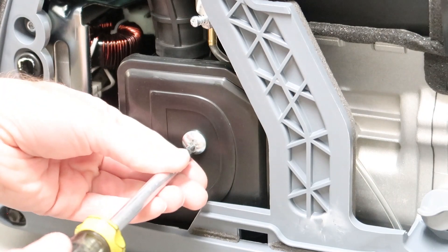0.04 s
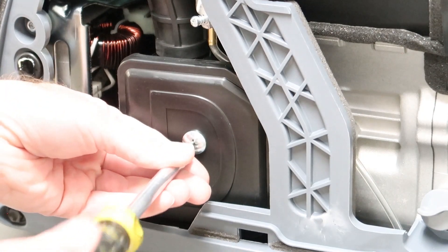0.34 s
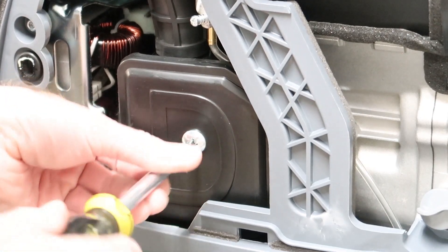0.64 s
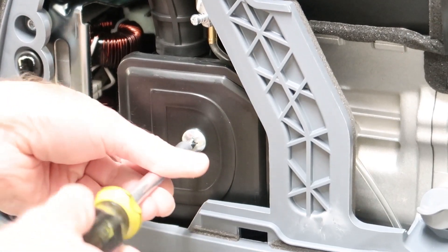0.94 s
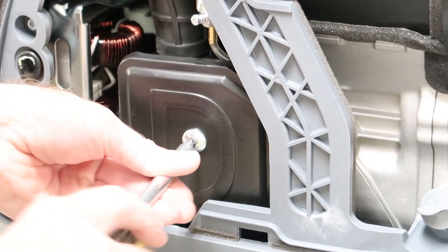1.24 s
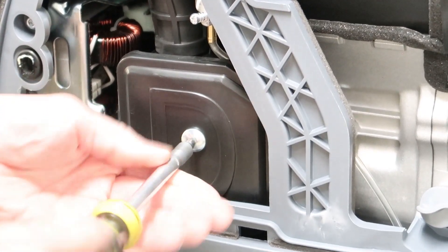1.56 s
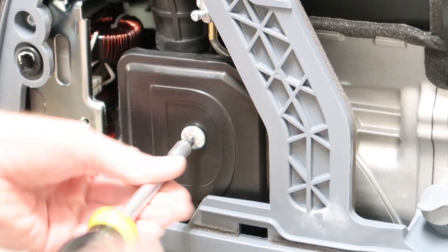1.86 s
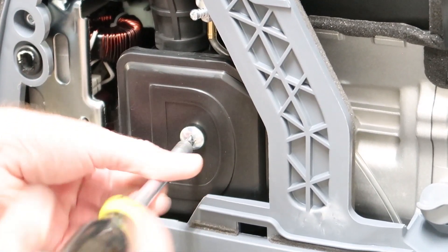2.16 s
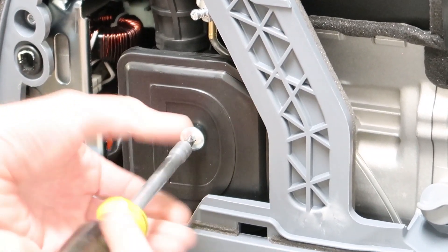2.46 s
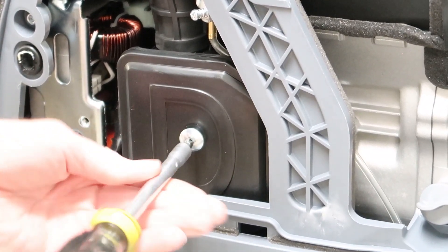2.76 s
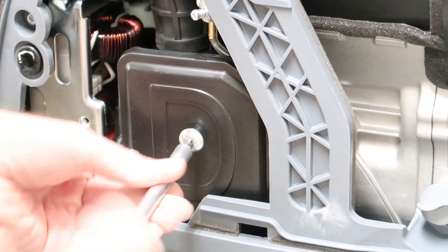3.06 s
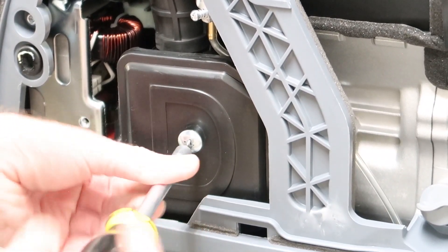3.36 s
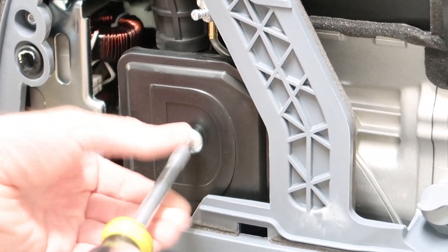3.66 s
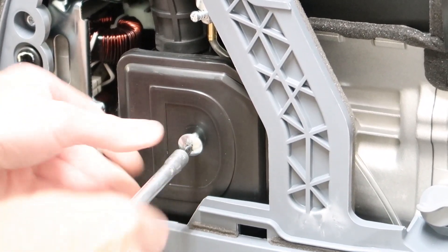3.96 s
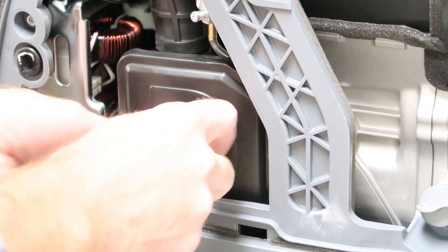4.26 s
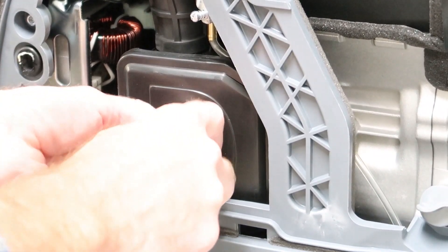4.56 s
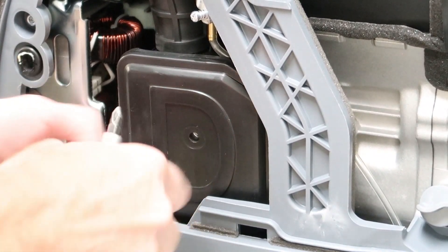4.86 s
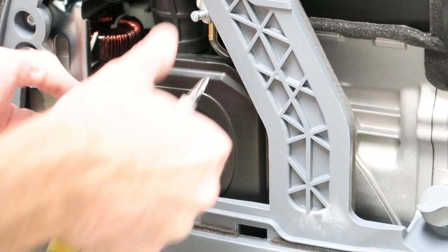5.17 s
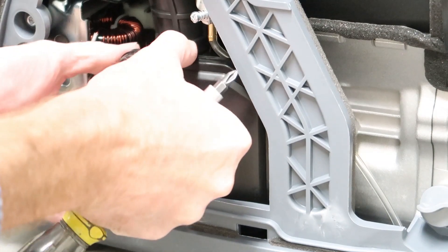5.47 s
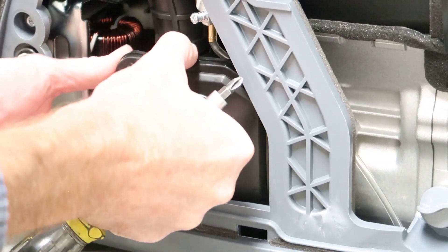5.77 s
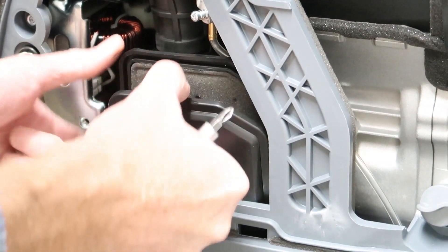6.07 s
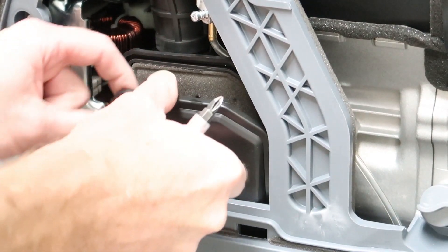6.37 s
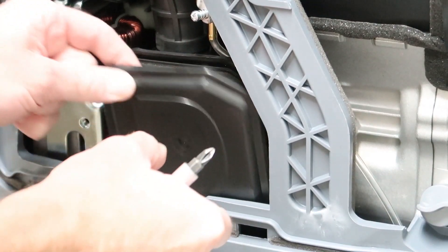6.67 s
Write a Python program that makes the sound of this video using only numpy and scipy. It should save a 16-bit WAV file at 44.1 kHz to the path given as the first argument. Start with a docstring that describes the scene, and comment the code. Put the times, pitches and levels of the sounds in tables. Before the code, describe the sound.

A screwdriver tip knocks and clicks into a screw on a plastic cover. The screw is then turned out in short repeated twists, the thread rasping and catching with small metallic ticks. The loose screw rattles and drags out of its hole. After a brief lull, the hollow cover rubs and comes off with a loud clack and a few lighter bumps. It is heard close up in a small workshop with a faint hum.

```python
"""Unscrewing an air-filter cover

A hand screwdriver backs a screw out of the plastic cover of a stopped engine, heard from close by.
The tip knocks into the screw head, and each impact excites the cover's damped modes. With every twist,
stick-slip friction makes the thread rasp and catch. The screw is drawn out and the hollow cover is
pulled off with a loud clack. A small workshop hums quietly around it."""
import sys
import numpy as np
from scipy import signal
from scipy.fft import rfft, irfft, next_fast_len
from scipy.io import wavfile
from scipy.ndimage import uniform_filter1d

SR = 44100
rng = np.random.default_rng(int(sys.argv[2]) if len(sys.argv) > 2 else 0)


def store_pcm(level_fs):
    """Save levels as 16-bit WAV."""
    pcm = np.round(np.clip(level_fs, -1, 1) * 32767).astype(np.int16)
    wavfile.write(sys.argv[1], SR, np.atleast_2d(pcm).T)


N = 296190
TIME = np.arange(N) / SR
AGE = np.arange(16384) / SR  # seconds since an excitation
TOP_HZ, SCATTER_FROM_HZ, COVER_BAND_HZ = 15750, 620, (200, 640)


def undb(db):
    """Decibels to gain."""
    return 10 ** (np.asarray(db) / 20)

def level(x, db):
    """Set the rms level."""
    return x * undb(db) / np.sqrt(np.mean(x ** 2))

def add(out, start, x):
    """Superposition: x joins the mix at a start time in seconds."""
    i = int(start * SR)
    out[i:i + len(x)] += x[:N - i]

def colour(x, points):
    """Minimum-phase filtering: a causal response through (Hz, dB) points."""
    size = 2 * next_fast_len(len(x))
    hz, db = np.transpose(points)
    bin_hz = np.arange(size // 2 + 1) * SR / size
    gain = undb(np.interp(np.log(bin_hz + 1), np.log(hz), db))
    cepstrum = irfft(np.log(gain))
    cepstrum[1:size // 2] *= 2
    cepstrum[size // 2 + 1:] = 0
    return irfft(rfft(x, size) * np.exp(rfft(cepstrum)))[:len(x)]

def band(x, lo_hz, hi_hz):
    """Band-pass filtering: 12 dB per octave on either side."""
    sos = signal.butter(2, [lo_hz, min(hi_hz, SR / 2 - 1)], "band", fs=SR, output="sos")
    return signal.sosfilt(sos, x)

def attack_rms(x):
    """Effective amplitude of a transient: the rms of its first 8 ms."""
    return np.sqrt(np.mean(x[:353] ** 2))

def walk(rate):
    """Random modulation: a smooth curve of unit rms, with `rate` new values a second."""
    hold = int(SR / rate)
    steps = np.repeat(rng.standard_normal(N // hold + 1), hold)
    return level(uniform_filter1d(uniform_filter1d(steps, hold), hold)[:N], 0)

def fade(t60):
    """Exponential damping: 60 dB down after t60 seconds."""
    return np.exp(-np.log(1000) * AGE / t60)

def stroke(start, length, attack_s, release_s):
    """Envelope of a driven vibration: linear rise, hold and exponential decay."""
    age = TIME - start
    return np.clip(age / attack_s, 0, 1) * np.exp(-np.maximum(age - length, 0) / release_s)

def wash(t60):
    """High modal overlap: decaying noise of unit energy with an even spectrum."""
    spectrum = rfft(rng.standard_normal(len(AGE)) * fade(1.33 * t60))
    x = irfft(spectrum / np.abs(spectrum)) * fade(2 * t60)
    return x / np.linalg.norm(x)

def ring(modes, scatter_db, detune=0.012):
    """Free vibration of unit energy: modal shares and tuning vary with where a part is struck and held."""
    x = 0
    for hz, db, t60 in modes:
        share, shift = rng.standard_normal(2)
        phase = 2 * np.pi * hz * (1 + detune * shift) * AGE + rng.uniform(-1.25, 1)
        x = x + undb(db + scatter_db * share) * fade(t60) * np.cos(phase)
    return x / np.linalg.norm(x)

def slips(count, rate, spread_db):
    """Stick-slip friction: random impulses of uneven size, `rate` a second, at unit rms."""
    sizes = undb(spread_db * np.minimum(rng.exponential(size=count), 4))
    return level(sizes * rng.choice([-1, 1], count) * (rng.random(count) < rate / SR), 0)

def scuff(jumps):
    """Finite slip time: convolution spreads each impulse into a tiny scrape."""
    return signal.oaconvolve(jumps, wash(0.007)[:512])[:len(jumps)]

def blows(rows, modes, panel_db, panel_t60, treble_db, modes_db=-10.5):
    """Impact on a shell: contact, dense panel rattle and modes, coloured by the contact's hardness."""
    out = np.zeros(N)
    bands_hz = [(180, 550), (550, 1400), (1400, 4300), (4300, 8000), (8000, 15000)]
    for start, db, thump, crack, top in rows:
        contact = wash(0.006) * undb(0.9 * max(crack, 0))  # a hard crack strengthens the first snap
        panel = undb(panel_db) * band(wash(panel_t60), SCATTER_FROM_HZ / 2, TOP_HZ)
        x = contact + panel + undb(modes_db) * ring(modes, scatter_db=2.5)
        # a small shell radiates little bass, and plastic falls off steeply above 4 kHz
        x = colour(x, [(60, -29), (165, -21), (235, 0), (3900, -9), (4700, -18), (15000, -27)])
        wanted_db = db + np.array([thump, 0, crack, (crack + top) / 2 + treble_db, top])
        for _ in range(2):  # two passes, since the bands overlap
            lift_db = wanted_db - [20 * np.log10(attack_rms(band(x[:512], *hz))) for hz in bands_hz]
            x = colour(x, [(np.sqrt(lo * hi), gain) for (lo, hi), gain in zip(bands_hz, lift_db)])
        add(out, start, x)
    return out

def taps(rows, modes):
    """Impulse response: one part rings at fixed pitches after each tap."""
    out = np.zeros(N)
    for start, db in rows:
        x = ring(modes, scatter_db=-1, detune=0)
        add(out, start, x * undb(db) / attack_rms(x))
    return out


# Spectrum of the room's air. Each row: frequency in Hz, relative spectral density in dB.
ROOM_AIR = [(12, -36), (20, -2.5), (126, -7), (153, -7), (274, -10), (1040, -22), (1500, -22),
            (6540, -34.5), (13500, -45), (15500, -55)]

def background(air_db=-51.5, hum_hz=120, hum_db=-55, drone_hz=36.2, drone_db=-47, drone_stop_s=1.68):
    """Ambient noise: broadband air, a wavering mains hum and a deep drone that stops early on."""
    mid, across = (level(colour(rng.standard_normal(N), ROOM_AIR), air_db) for _ in range(2))
    # the hiss is unrelated left and right, the rumble is shared
    side = colour(across, [(110, -21.5), (200, -7.5), (400, -1), (1200, 0)])
    running = np.exp(-np.maximum(TIME - drone_stop_s, 0) / 0.23)
    hum = level(np.sin(2 * np.pi * hum_hz * TIME + 0.5 * walk(9)) * undb(2 * walk(5)), hum_db)
    drone = np.sqrt(2) * np.sin(2 * np.pi * drone_hz * TIME + 0.11 * walk(7)) * undb(drone_db)
    air = np.array([mid + side, mid - side]) * undb(3 * running)  # louder while the drone lasts
    return air + hum + drone * running


# Knocks on the seated cover. Each row: start in seconds, level at 550-1400 Hz in dB, then the
# low thump, the crack and the top in dB relative to that level.
KNOCKS = [(0.0592, -39, 4.5, 2.5, -24), (0.1432, -41.5, 3, 2, -30), (0.231, -54, 16.5, 5.5, -41),
          (0.237, -36.5, -15, 0.5, -34), (0.2699, -39.5, -44, -2.5, -14), (0.29, -39, -19.5, -9, -24),
          (0.5463, -30.5, 2, -11.5, -18), (0.6839, -19, 0, -11, -19), (0.6965, -28.5, 8.5, 5.5, -41),
          (0.7055, -18, 1.5, 3.5, -18.5), (0.9288, -31.5, -3.5, -1.5, -37), (0.944, -36.5, 8.5, 2, -24.5),
          (1.0872, -33, -16, -3.5, -24), (1.1, -36.5, -3.5, -8, -26), (1.1404, -23, -4, 1.5, -8),
          (1.226, -47, 4, 8, -14), (3.756, -31.5, -1, -1, -27), (3.912, -42, -0.5, -6, -45),
          (4.1818, -40.5, 7, -0.5, -24.5), (4.2277, -42, 4.5, -6, -26), (4.319, -28.5, 5, -0.5, -10),
          (4.331, -29.5, -10, -1, -16), (4.3935, -32, 3.5, 1.5, -25.5), (4.5672, -41.5, 4, 2, -14.5),
          (4.586, -34, -1.5, -1, -25), (4.62, -45.5, -3, 10, 7.5), (4.6268, -30.5, 0.5, -13, -50),
          (4.719, -37.5, 5.5, 0.5, -34), (4.742, -36, -8, 0.5, -23), (4.7605, -38, -2, 5.5, -29),
          (4.7775, -36, -4.5, 0, -32)]
# Modes of the seated cover. Each row: frequency in Hz, relative level in dB, T60 in seconds.
SEATED_MODES = [(253.6, 1.5, 0.066), (325.8, 3.5, 0.077), (479, -0.5, 0.14), (674, -1, .05),
                (734, 2.5, 0.12), (994, -1, 0.11), (1322, 1.5, .05), (1760, 16, 0.014), (2254, 3, 0.09),
                (3790, -3.5, .022)]

def tool_knocks():
    """Impact excitation: tool and screw knock on the cover while it is held in its seat."""
    return blows(KNOCKS, SEATED_MODES, panel_db=4.5, panel_t60=0.11, treble_db=0.5)


# Square taps of the tip. Each row: start in seconds, level in dB.
FACE_TAPS = [(0.29, -41), (0.5469, -22.5), (1.099, -30.5)]
# Modes of the cover's face. Each row: frequency in Hz, relative level in dB, T60 in seconds.
FACE_MODES = [(277, 1.5, .07), (955, 2.5, 0.063), (1020, -1, 0.053), (1140, -6, 0.049), (1274, -8, 0.091),
              (1800, -8, 0.027), (1970, -6, .03), (2285, -6, 0.036)]

def face_taps():
    """Plate vibration: a square tap of the tip leaves the cover's face ringing."""
    return taps(FACE_TAPS, FACE_MODES)


# Strong catches of steel on steel; the first two rows are the shaft ringing after the two hardest knocks. Each
# row: time in seconds, tick level in dB, cover and # shaft levels in dB relative to the tick, time constant of
# the following rasp in seconds.
CATCHES = [(0.7055, -37.5, -20, 7, .003), (1.14, -36, -17, 1, 0.0047), (1.378, -49, -10, -28, .01),
           (1.411, -51, -6, -9, 0.016), (1.515, -50, 6.5, -16, 0.017), (1.532, -41.5, 1, -9, 0.023),
           (1.578, -41, -12, -9, 0.013), (1.589, -31, -9, -10, 0.0081), (1.656, -45.5, 5, -28, 0.005),
           (1.68, -43.5, -10, 3, 0.018), (1.698, -40.5, -10, -12, 0.0092), (1.723, -38.5, -8, -27, 0.01),
           (1.738, -35.5, -8, -10, 0.01), (1.749, -33, -9, -14, .014), (1.7796, -40, -3, -10, .012),
           (1.796, -38.5, -1, -17, 0.028), (1.839, -36, -4.5, -29, 0.019), (1.979, -35, 0, -15, 0.017),
           (1.998, -31.5, -8, -3.5, .022), (2.077, -35, 4.5, -0.5, 0.021), (2.101, -35.5, -4, -11, 0.011),
           (2.18, -37, -20, -25, 0.0098), (2.1975, -38, -16.5, -13, .006), (2.2066, -33, -23, -1.5, 0.022),
           (2.352, -40.5, -18, -26, 0.0052), (2.376, -30, -3, -5.5, 0.0093), (2.422, -37.5, -2, 0, 0.015),
           (2.4596, -31, -3.5, 0.5, 0.014), (2.4864, -35, 1, 4, 0.0083), (2.505, -42, 8, -24, 0.0048),
           (2.56, -35, -10, -16, 0.025), (2.576, -39, 5, -4.5, 0.021), (2.617, -36, -8, -24, 0.0032),
           (2.673, -41.5, 5, -9, 0.0054), (2.7815, -35, -1.5, 4.5, 0.029),
           (2.8513, -34.5, -15, 7.5, 0.0066), (2.867, -32.5, -5, -1, 0.034), (2.941, -40, 3.5, 1.5, 0.0036),
           (2.993, -31, -2.5, 0.5, .012), (3.001, -28.5, -7.5, -12, 0.0043), (3.066, -39.5, -6, -12, 0.005),
           (3.1743, -32, 0, -5, 0.0031), (3.187, -33.5, -10, -6.5, 0.02), (3.25, -42.5, 0, -0.5, 0.075),
           (3.274, -43.5, -0.5, 2, 0.013), (3.327, -39, 4, -4.5, 0.022), (3.404, -31, -22, -3.5, 0.0056),
           (3.425, -34, -20, 3.5, 0.0058), (3.563, -55, 3, 5, 0.015), (3.592, -28.5, -6, -14, 0.0072),
           (3.604, -39, 8, -7, 0.019), (3.6578, -40, -2, -10, .006), (3.67, -40, -1, -3.5, 0.015),
           (3.724, -35.5, 0, -8, 0.022), (3.788, -29.5, -28, -15, 0.017), (3.8, -31.5, -4.5, -7, 0.0044),
           (3.9625, -40, -18, -20, 0.0057), (3.9705, -35.5, -5.5, -1, 0.011),
           (4.0193, -38, -12, -15, 0.0091), (4.311, -33.5, -6, -4.5, 0.0079), (4.444, -43, -1, -3.5, 0.01),
           (5.128, -39, -30, -11, 0.0069), (5.149, -43, -25, -14, 0.0044), (5.173, -45, -21, -5.5, 0.051),
           (5.207, -37.5, -31, 1, 0.011)]
# Response of screw and shaft to friction. Each row: frequency in Hz, gain in dB.
STEEL_SPECTRUM = [(150, -37), (300, -21), (800, 3.5), (1350, 8), (2400, 10.5), (3200, 5.5), (3700, 14.5),
                  (4400, 1), (5000, -4), (5650, 4), (6100, -1), (6600, -16), (7400, -7.5), (10000, -11),
                  (14000, -40)]
# Modes of the finger-damped shaft. Each row: frequency in Hz, relative level in dB, T60 in seconds.
SHAFT_MODES = [(5760, 3.5, 0.0045), (5930, -6, 0.0011), (6550, 5.5, 0.0072), (7180, 8, 0.0006)]
# Modes of the cover shaken through the screw, with the same columns.
SHAKEN_MODES = [(222, -7.5, .06), (262, -7, .06), (330, -1.5, .06), (396, -8, .04), (455, -1, .05),
                (500, 0, .06), (586, -5, .04)]

def catches(rasp_db=4.5, lead_db=-8, lead_s=0.03, rise_s=0.007, top_db=-19.5, size=6144):
    """Release of elastic strain: the thread grinds, lets go with a tick and runs on in gritty slips."""
    out, lead = np.zeros(N), int(lead_s * SR)
    age, grit = AGE[:size] - lead_s, undb(3 * walk(260))
    for start, db, cover_db, shaft_db, decay_s in CATCHES:
        build_up = undb(lead_db) * np.exp(-np.abs(age) / rise_s)
        swell = np.where(age < 0, build_up, np.exp(-np.abs(age) / max(decay_s, 0.002)))
        rasp = scuff(slips(size, rate=2400, spread_db=2)) * swell * grit[int(start * SR):][:size]
        force = np.roll(wash(0.0047)[:size], lead) + undb(rasp_db) * rasp / np.linalg.norm(rasp)
        # the tip seats differently each time, which shifts the steel's resonances
        seat = 1 + 0.045 * rng.standard_normal()
        tick = colour(force, [(hz * seat, gain) for hz, gain in STEEL_SPECTRUM])
        shaft_ring = ring([(hz * seat, gain, t60) for hz, gain, t60 in SHAFT_MODES], scatter_db=1.5)
        shaft = signal.fftconvolve(force, shaft_ring[:lead])[:size]
        cover = np.roll(ring(SHAKEN_MODES, scatter_db=4), lead)[:size]
        parts = [(band(tick, 500, 4500), 0),
                 (band(cover, *COVER_BAND_HZ), cover_db),
                 (band(shaft, 4800, 8400), shaft_db),
                 (band(force, 7600, 11500), top_db + shaft_db / 2)]  # brighter as the shaft rings harder
        for x, relative_db in parts:
            add(out, start - lead_s, x * undb(db + relative_db) / attack_rms(x[lead:]))
    return out


# Snaps of the cover's rim. Each row: start in seconds, level in dB.
RIM_SNAPS = [(0.7058, -21), (6.1008, -12.5)]
# Modes of the rim. Each row: frequency in Hz, relative level in dB, T60 in seconds.
RIM_MODES = [(2380, -4.5, 0.028), (3240, -11.5, 0.058), (3884, 0, .025), (4114, -2, 0.018),
             (7450, -8, 0.012)]

def rim_snaps():
    """Transient excitation: the rim rings as it snaps against its seat, and later free of it."""
    return taps(RIM_SNAPS, RIM_MODES)


# Low swells after heavy knocks. Each row: start in seconds, length in seconds, level in dB.
BOOMS = [(1.148, 0.23, -49), (6.108, 0.16, -48.5)]

def room_boom(hz=120.3, attack_s=0.04, release_s=0.062):
    """Standing wave: the room's lowest mode answers late and softly."""
    tone = np.sqrt(2) * np.sin(2 * np.pi * hz * TIME + 0.5 * walk(9))
    return tone * sum(undb(db) * stroke(start, length, attack_s, release_s) for start, length, db in BOOMS)


def bend(x, depth_s):
    """Frequency modulation by a wandering delay: changing hand pressure bends the resonances."""
    return np.interp(TIME + depth_s * walk(10), TIME, x)

# Twists of the wrist, about 2.4 a second. Each row: start in seconds, length in seconds, gain of the
# steel's rasp in dB, gain of the cover's grumble in dB.
TWISTS = [(1.487, 0.41, -53.5, -45), (1.96, 0.31, -46, -44.5), (2.363, 0.26, -47.5, -50),
          (2.754, 0.27, -45.5, -44), (3.172, 0.28, -48.5, -45), (3.562, .26, -49, -43.5),
          (3.95, 0.051, -44.5, -61.5), (4.277, 0.026, -52, -39)]
# Modes of the screw. Each row: frequency in Hz, relative level in dB, T60 in seconds.
SCREW_MODES = [(1400, -4, .012), (2290, -2, .02), (2672, -3, .025), (3750, 0, .013)]

def thread(attack_s=0.0079, release_s=0.076):
    """Friction-driven vibration: slips and small catches make the steel rasp and the cover grumble."""
    grip = undb(3 * walk(70) + 3 * walk(260))  # clusters and finer grit
    ticks = level(scuff(slips(N, rate=150, spread_db=4)), 0)
    force = level(scuff(slips(N, rate=2400, spread_db=1.5)) * grip, 0) + undb(-6) * ticks

    def rung(modes, db):
        """Resonant response to the small catches."""
        return level(signal.oaconvolve(ticks, ring(modes, scatter_db=1.5))[:N], db)

    crackle = level(band(slips(N, rate=170, spread_db=4), 7000, 14500), -23)
    rasp = level(colour(force, STEEL_SPECTRUM), 2) + rung(SHAFT_MODES, -15) + rung(SCREW_MODES, -12)
    shaken = signal.oaconvolve(force, ring(SHAKEN_MODES, scatter_db=4))[:N]
    grumble = level(band(shaken, *COVER_BAND_HZ), -4) + rung(SHAKEN_MODES[2:], -10)
    grumble *= undb(2.2 * walk(35))  # the tip bears on the cover by fits and starts
    rasp = bend(rasp, depth_s=0.0045) + crackle
    grumble = bend(grumble, depth_s=0.004)
    creep = (1.49, 3.06, -67.5, -49.5)  # one long, faint twist: the screw creeps between the others
    return sum(stroke(start, length, attack_s, release_s) * (rasp * undb(steel) + grumble * undb(cover))
               for start, length, steel, cover in TWISTS + [creep])


# Burrs snapping in the thread. Each row: start in seconds, level in dB.
BURRS = [(1.98, -60), (2.01, -50), (2.098, -52.5), (2.7817, -43), (2.7924, -59), (2.8053, -58),
         (2.8436, -44), (2.9282, -52), (2.993, -46), (3.426, -48), (3.5644, -54), (3.5805, -50),
         (3.8058, -49), (4.3108, -44), (5.209, -63)]

def burrs(centre_hz=10500, spread=0.12, t60=0.0054):
    """Brief band-limited transients: each burr snaps with a thin tick at its own high pitch."""
    out = np.zeros(N)
    for start, db in BURRS:
        hz = centre_hz * (1 + spread * rng.standard_normal())
        tick = band(wash(t60), hz * 0.8, hz * 1.2)
        add(out, start, tick * undb(db) / attack_rms(tick))
    return out


def squeak(start_s=4.126, hz=2350, db=-48, length_s=0.03):
    """Narrow-band resonance: slips briefly lock onto one mode of the screw."""
    tone = level(band(slips(len(AGE), rate=2000, spread_db=2), hz * 0.92, hz * 1.08), db)
    out = np.zeros(N)
    add(out, start_s, tone * np.exp(-(AGE / length_s) ** 2))
    return out


# Rattles of the loosened screw. Each row: start in seconds, level in dB.
RATTLES = [(4.322, -29.5), (4.586, -37), (4.627, -40)]
# Modes of the screw in its hole. Each row: frequency in Hz, relative level in dB, T60 in seconds.
HOLE_MODES = [(1300, -4, 0.08), (1453, 4, 0.069), (1760, -4, .06)]

def screw_rattles():
    """Impacts across a clearance: the loosened screw strikes its hole and rings."""
    return taps(RATTLES, HOLE_MODES)


# Rubs on the plastic. Each row: start in seconds, length in seconds, gain in dB.
RUBS = [(4.696, 0.085, -29.5), (5.765, 0.21, -55.5), (6.004, 0.089, -41), (6.064, 0.022, -25.5),
        (6.62, 0.095, -44.5)]

def slide(attack_s=0.024, release_s=0.013):
    """Sliding friction: the screw drags out of its hole, then the rim rubs on the housing."""
    plastic = [(150, -22.5), (300, -4.5), (500, 5.5), (750, -2), (1200, -11), (4000, -22), (12000, -51)]
    rub = level(colour(slips(N, rate=620, spread_db=-5), plastic), -2)
    return rub * sum(undb(db) * stroke(start, length, attack_s, release_s) for start, length, db in RUBS)


# Bumps of the loose cover. Each row: start in seconds, level at 550-1400 Hz in dB, then the
# low thump, the crack and the top in dB relative to that level.
BUMPS = [(5.366, -53.5, 4.5, -8, -17), (5.712, -63, 15, 0, -13), (6.0002, -39.5, -1.5, -24, -40),
         (6.025, -21, -2.5, -14.5, -34), (6.0905, -24.5, -5.5, -11, -24.5), (6.1005, -4, -13, -7, -31),
         (6.112, -17, 1, -16, -41), (6.4248, -22, -9, -14.5, -45), (6.6275, -31.5, -8.5, -18, -59.5),
         (6.6467, -31, -3, -27, -61)]
# Modes of the loose shell. Each row: frequency in Hz, relative level in dB, T60 in seconds.
LOOSE_MODES = [(226, -11, .07), (327.8, -1, 0.24), (365, -12.5, 0.16), (535, 6, 0.1), (645, 13, 0.073),
               (727, 8, 0.11), (890, 3.5, 0.04), (1014, -1.5, .06), (1235, 6, 0.09), (1862, 0.5, .04),
               (2410, -5.5, .06), (3180, -9.5, .06), (4180, 7, 0.018)]

def cover_bumps():
    """Shell resonance: the freed, hollow cover clacks against its housing."""
    return blows(BUMPS, LOOSE_MODES, panel_db=2.5, panel_t60=0.065, treble_db=-1.5)


def reverb(t60):
    """Diffuse reverberation: decaying noise of unit energy."""
    x = rng.standard_normal(len(AGE)) * fade(t60)
    return x / np.linalg.norm(x)

# Air modes in the engine's casing. Each row: frequency in Hz, relative peak in dB, T60 in seconds.
CAVITY_MODES = [(219.5, 5, 0.22), (265.1, 2, 0.25), (334.9, 2, 0.21), (397, -7, 0.25), (468, 0.5, 0.11),
                (592, -10.5, 0.41), (711, -4, 0.17)]
# Stereo width. Each row: frequency in Hz, gain of the side signal in dB.
WIDTH = [(100, -36.5), (600, -25), (1200, -19), (2800, -11.5), (5000, -3.5), (7000, 0.5), (9500, 4.5),
         (14000, 5.5)]

def workshop(x, near_db, far_db, cavity_db, bass_db, build_s=0.0032):
    """Scattering, reflection and cavity resonance: the surroundings colour a sound, and the stereo image is
    wide, most of all in the treble."""
    def tail():
        """Engine parts scatter short waves early; the walls return a longer decay."""
        near = undb(near_db) * band(wash(0.18), SCATTER_FROM_HZ, TOP_HZ)
        far = undb(far_db) * (band(reverb(0.33), 300, 2700) + band(reverb(0.22), 2700, 6900))
        return (near + far) * (1 - np.exp(-AGE / build_s))

    direct = AGE == 0
    casing = sum(undb(db + cavity_db) * 2 * fade(t60) / fade(t60).sum() * np.cos(2 * np.pi * hz * AGE)
                 for hz, db, t60 in CAVITY_MODES)
    mid = colour(direct + tail() + casing, [(450, bass_db), (750, 0.0014)])
    # the image is wide from the first instant, most of all in the treble
    side = colour(tail() + undb(-4) * wash(0.008), WIDTH)
    return np.array([signal.oaconvolve(x, mid + sign * side)[:N] for sign in (1, -1)])

def shifting(rate, count=4):
    """Time-varying paths: shares that sum to one pass the lead back and forth as the hands move."""
    weights = np.exp(2 * np.array([walk(rate) for _ in range(count)]))
    return weights / weights.sum(axis=0)

def scene():
    """Superposition of sources: tool, screw and cover sound in the workshop, in stereo."""
    seated = tool_knocks() + face_taps() + screw_rattles()
    loose = cover_bumps() + rim_snaps()
    friction = catches() + thread() + burrs() + slide() + squeak()
    # the turning hands keep changing the reflections around the screw
    turning = sum(workshop(friction * share, near_db=0.1, far_db=-8.5, cavity_db=3, bass_db=0)
                  for share in shifting(rate=10))
    return (workshop(seated, near_db=-9, far_db=-7.5, cavity_db=0.5, bass_db=-2.1)
            + workshop(loose, near_db=-7.5, far_db=-11, cavity_db=3, bass_db=-0.3)
            + turning + room_boom() + background())

def gain_control(x, threshold=0.54, duck_db=4, release_s=0.7):
    """Automatic gain control: an overload turns the gain down, and it creeps back afterwards."""
    overload = np.clip(np.abs(x).max(axis=0) / threshold - 1, 0, 1)
    decay = np.exp(-TIME / release_s)
    held = np.maximum.accumulate(overload / decay) * decay
    attack = signal.butter(1, 6, fs=SR, output="sos")
    return x * undb(-duck_db * signal.sosfilt(attack, held))

def record(dry):
    """Band and amplitude limiting: the microphones dull the top; peaks duck and clip before a low-pass."""
    dull = np.array([colour(x, [(12500, -2.5), (15000, -17.5), (17000, -20)]) for x in dry])
    clipped = np.clip(gain_control(dull), -1, 1)
    return signal.sosfilt(signal.ellip(8, 0.2, 70, TOP_HZ, fs=SR, output="sos"), clipped)


dry = scene()
out = record(dry)
store_pcm(out)
```